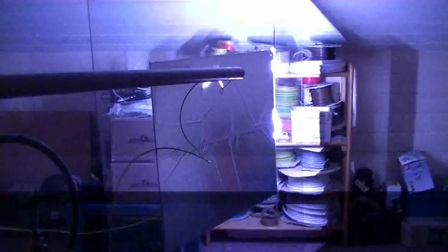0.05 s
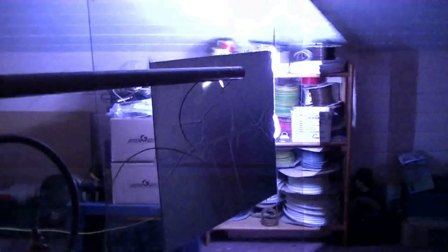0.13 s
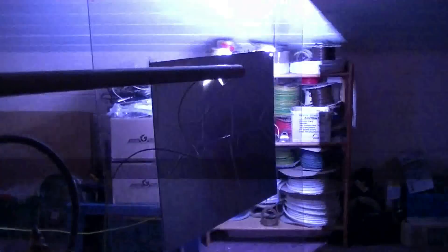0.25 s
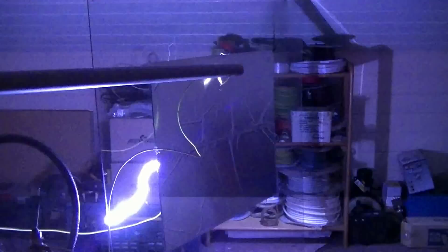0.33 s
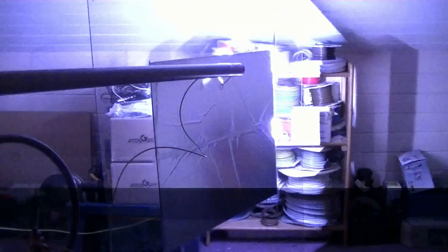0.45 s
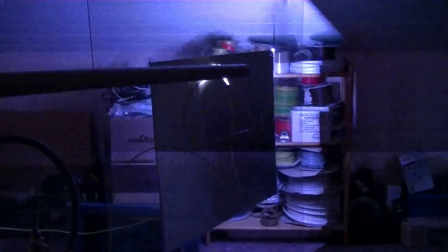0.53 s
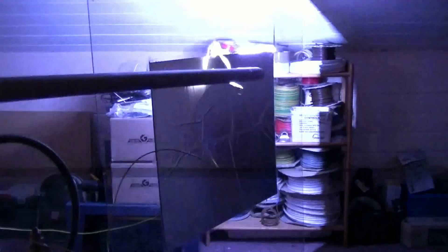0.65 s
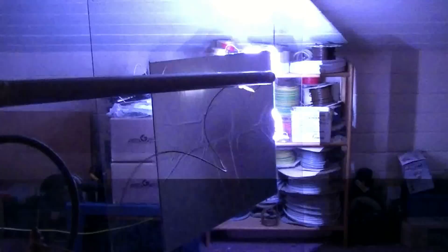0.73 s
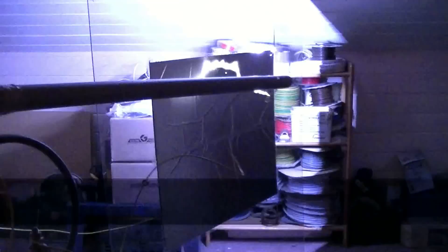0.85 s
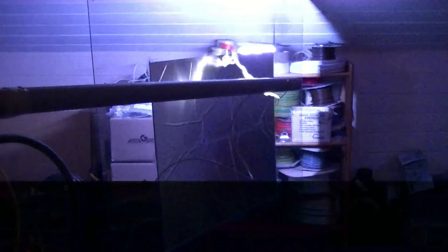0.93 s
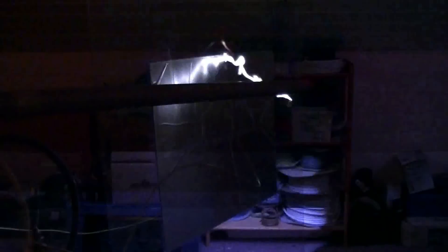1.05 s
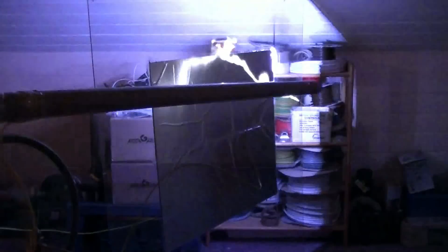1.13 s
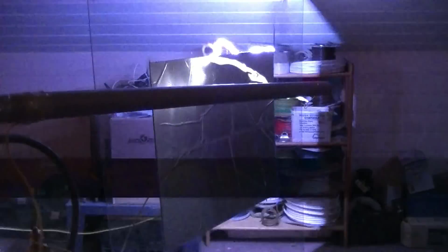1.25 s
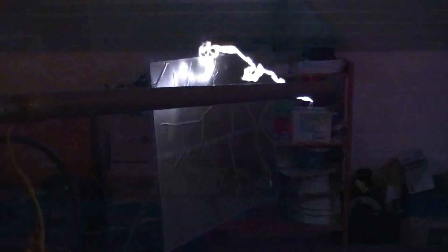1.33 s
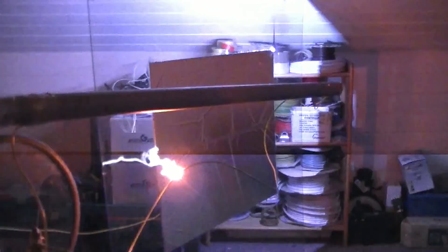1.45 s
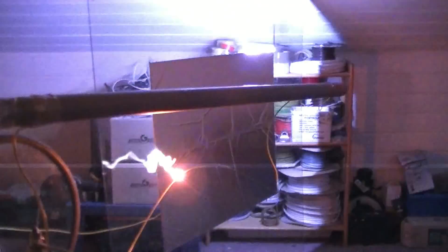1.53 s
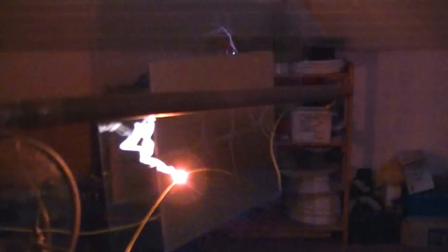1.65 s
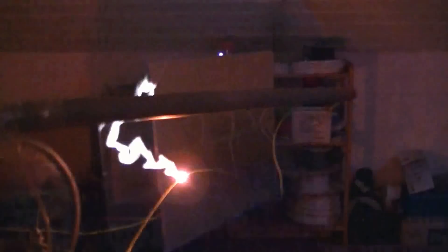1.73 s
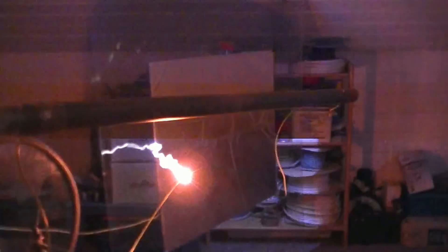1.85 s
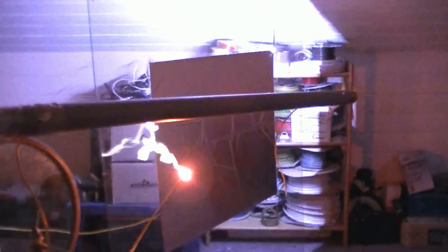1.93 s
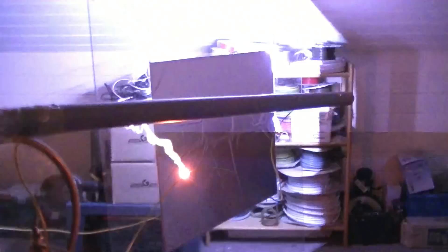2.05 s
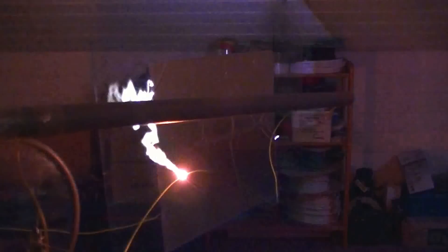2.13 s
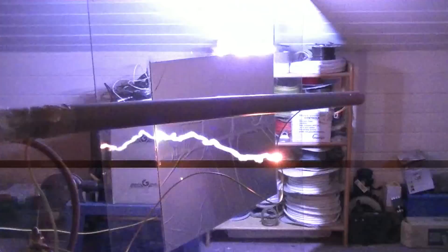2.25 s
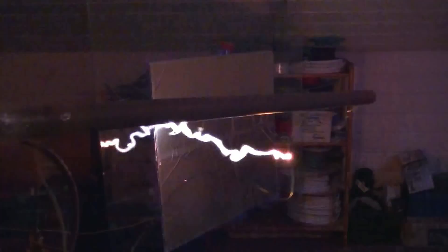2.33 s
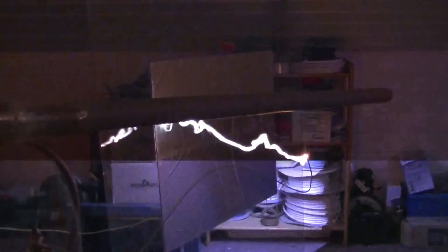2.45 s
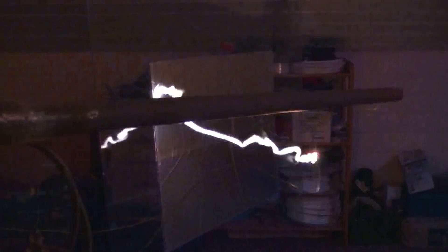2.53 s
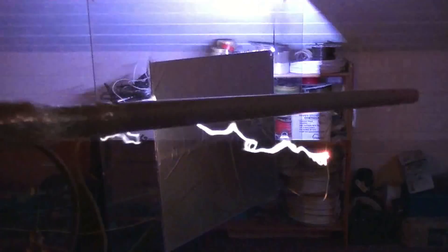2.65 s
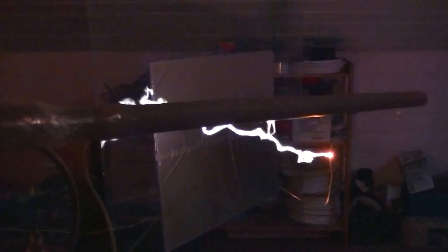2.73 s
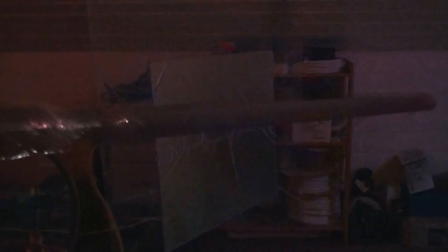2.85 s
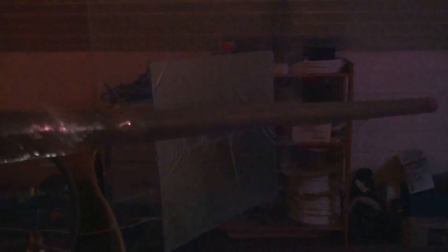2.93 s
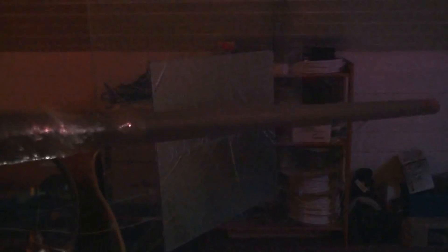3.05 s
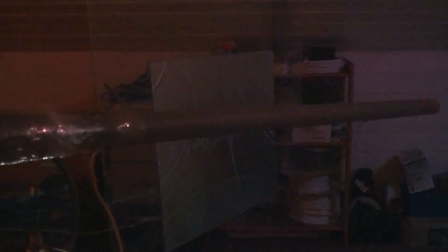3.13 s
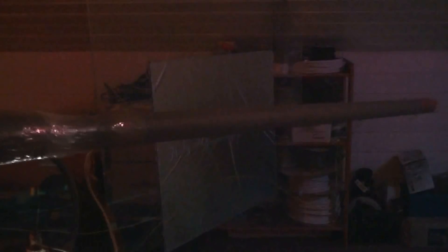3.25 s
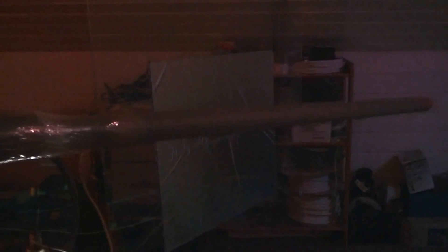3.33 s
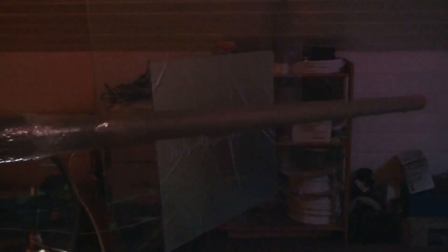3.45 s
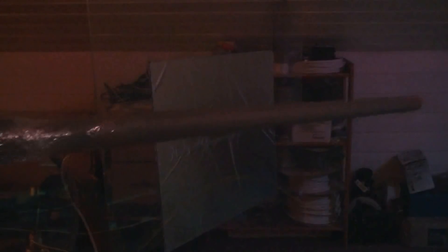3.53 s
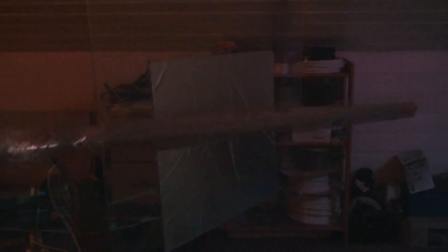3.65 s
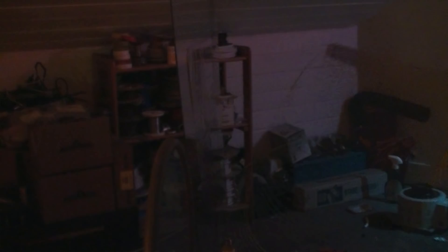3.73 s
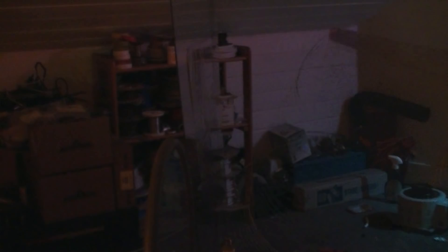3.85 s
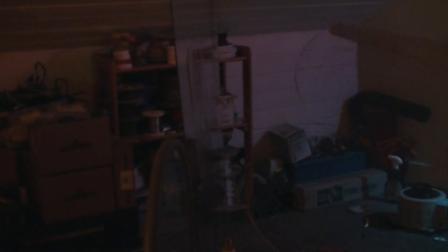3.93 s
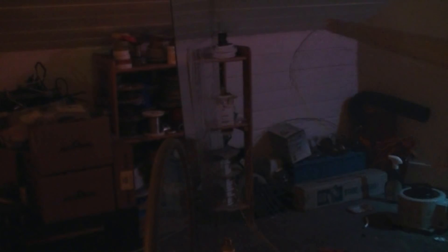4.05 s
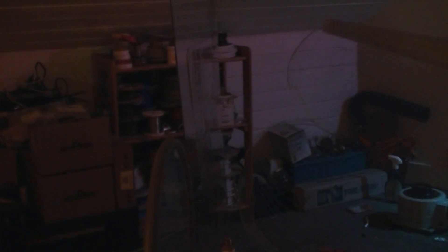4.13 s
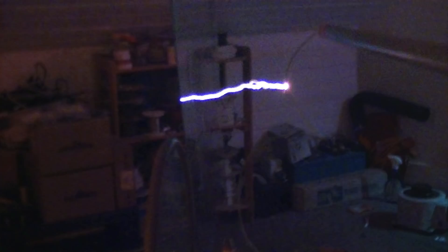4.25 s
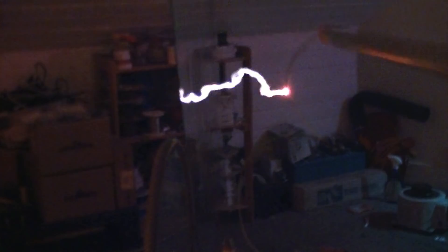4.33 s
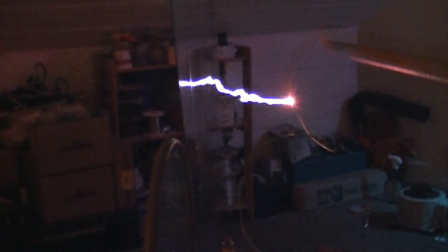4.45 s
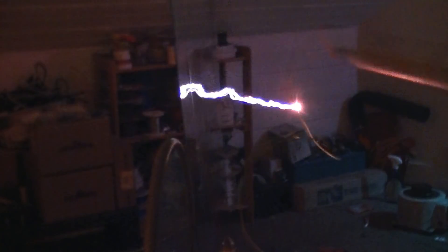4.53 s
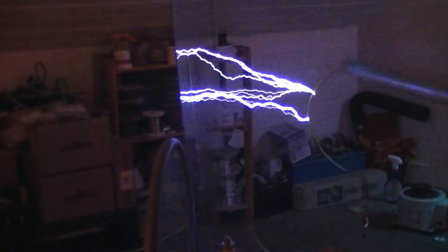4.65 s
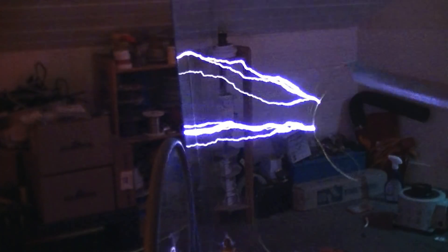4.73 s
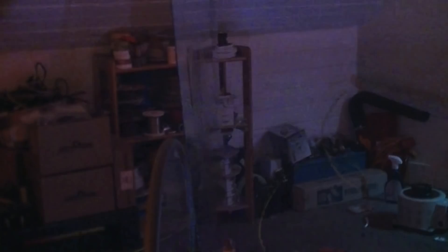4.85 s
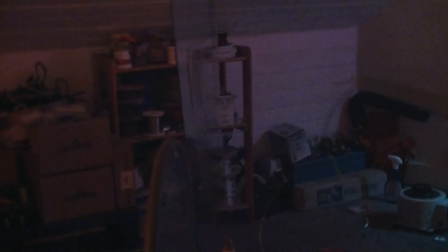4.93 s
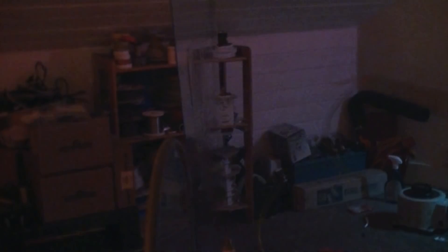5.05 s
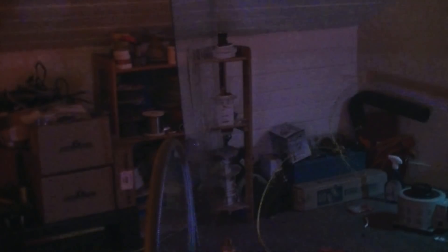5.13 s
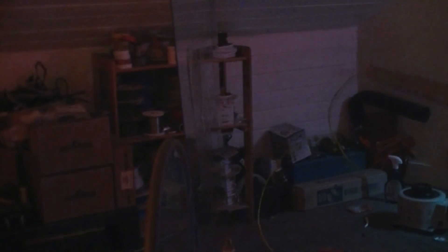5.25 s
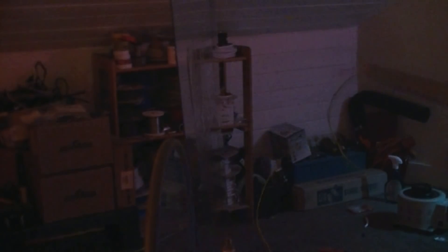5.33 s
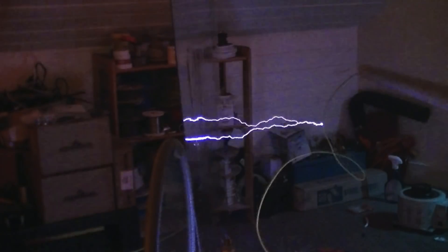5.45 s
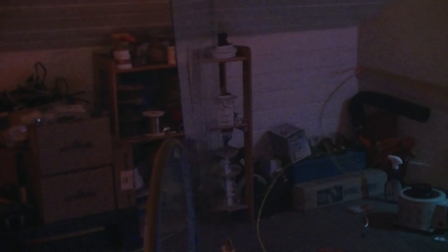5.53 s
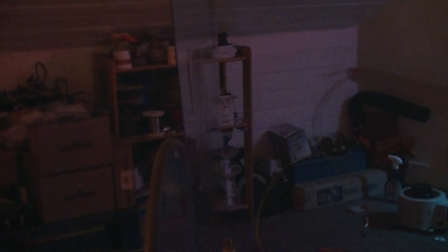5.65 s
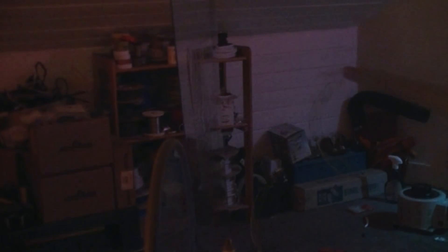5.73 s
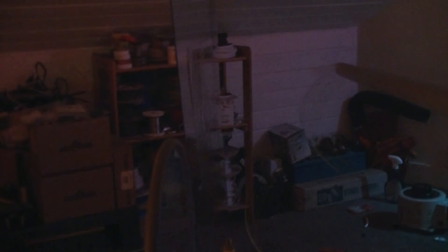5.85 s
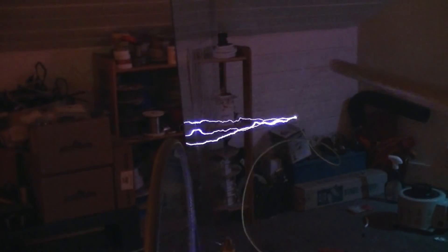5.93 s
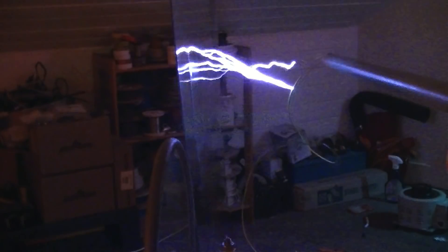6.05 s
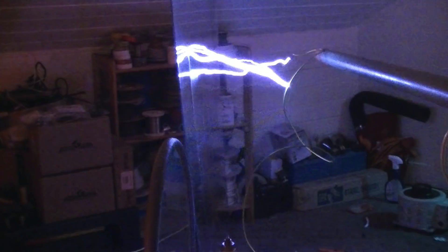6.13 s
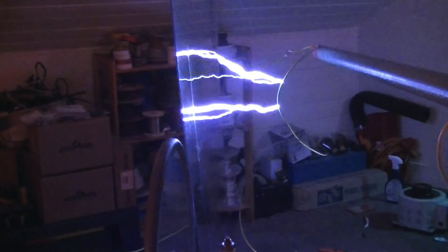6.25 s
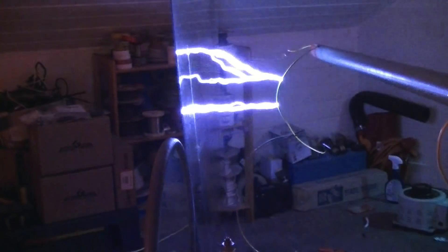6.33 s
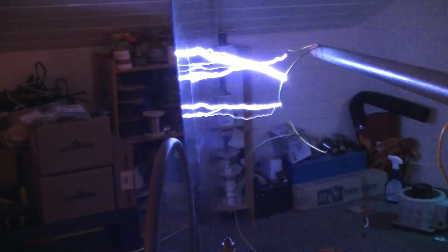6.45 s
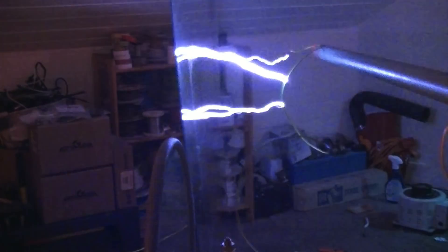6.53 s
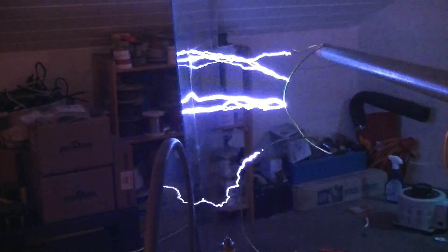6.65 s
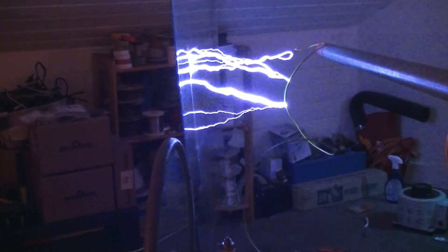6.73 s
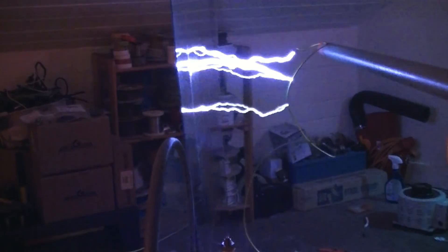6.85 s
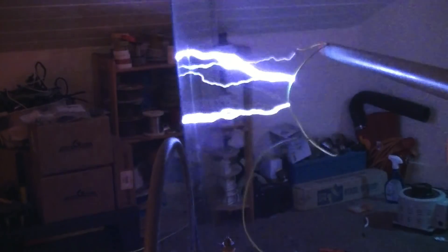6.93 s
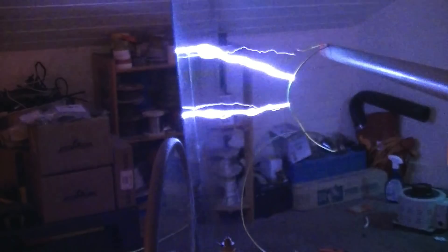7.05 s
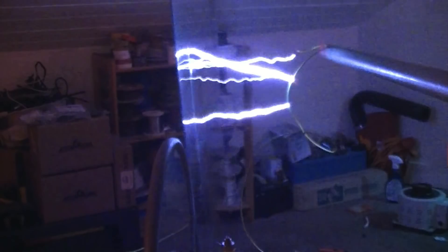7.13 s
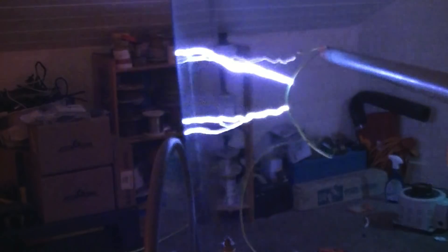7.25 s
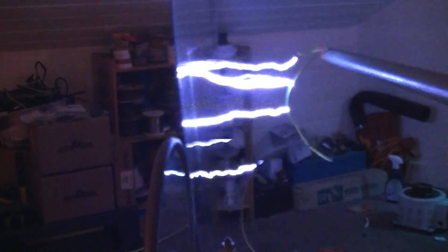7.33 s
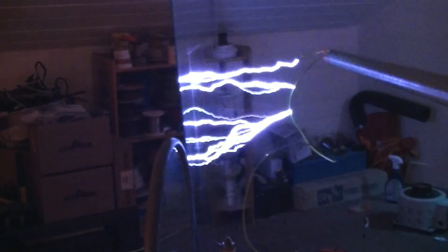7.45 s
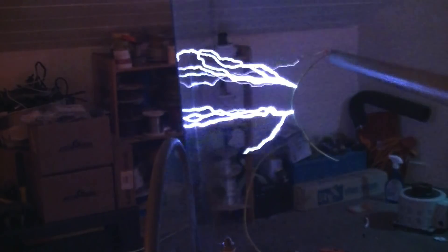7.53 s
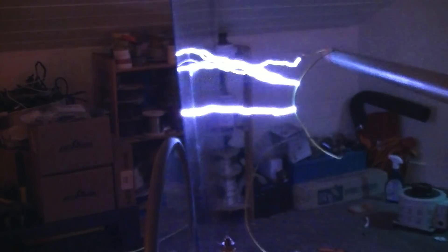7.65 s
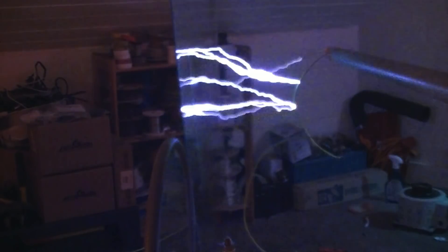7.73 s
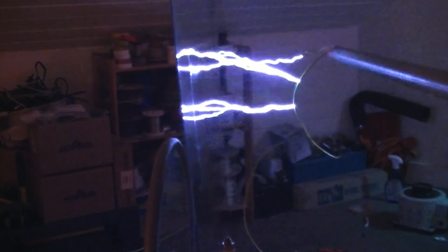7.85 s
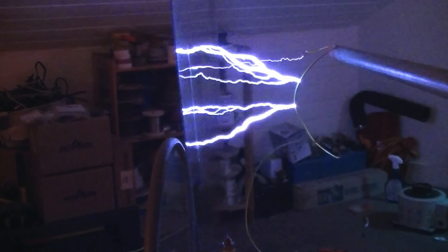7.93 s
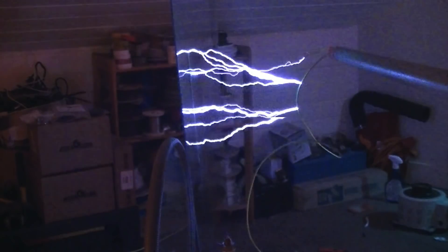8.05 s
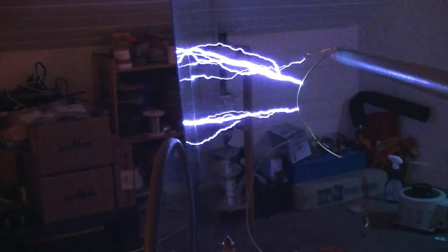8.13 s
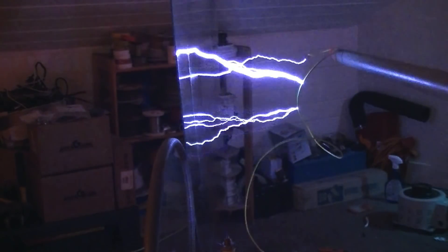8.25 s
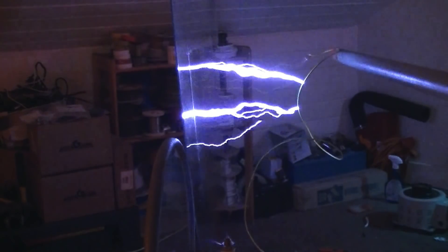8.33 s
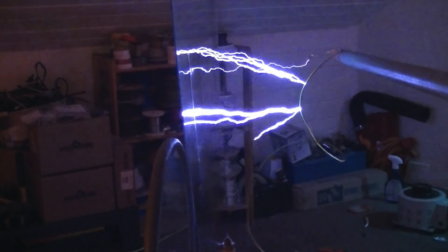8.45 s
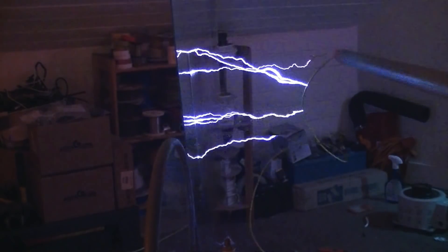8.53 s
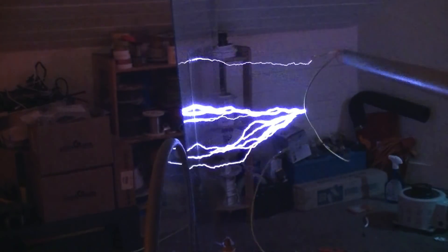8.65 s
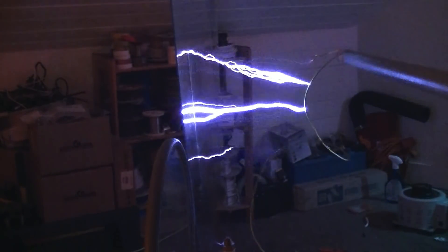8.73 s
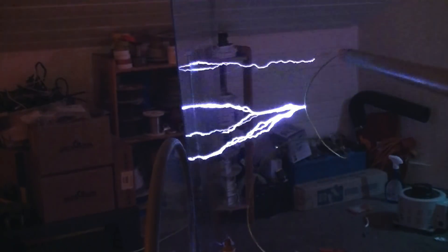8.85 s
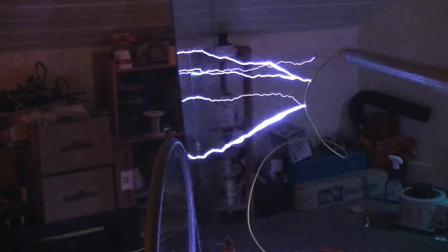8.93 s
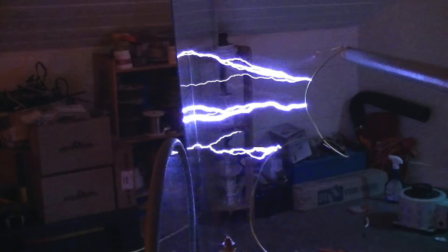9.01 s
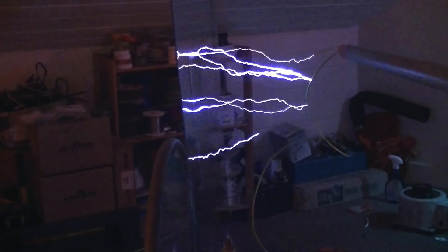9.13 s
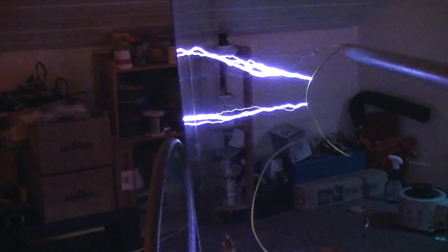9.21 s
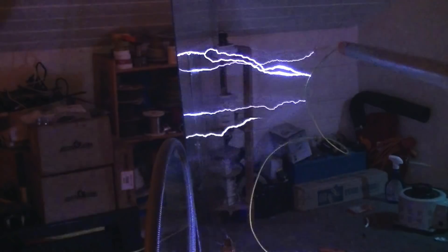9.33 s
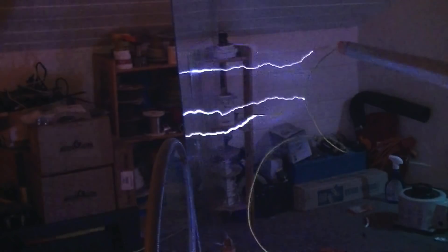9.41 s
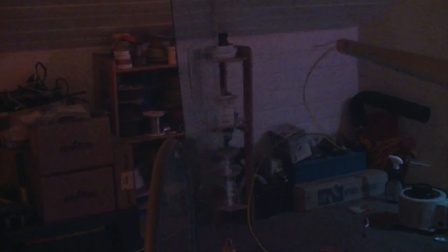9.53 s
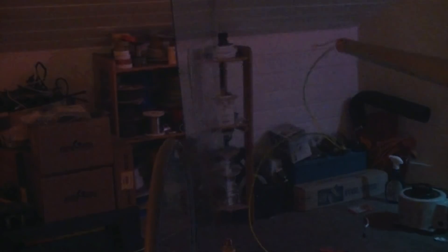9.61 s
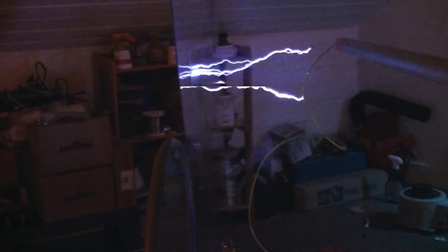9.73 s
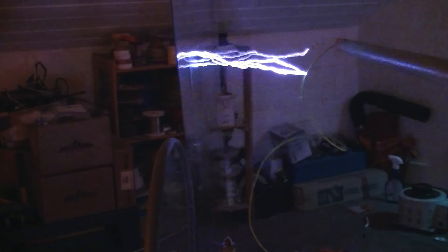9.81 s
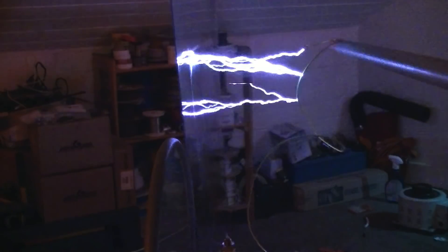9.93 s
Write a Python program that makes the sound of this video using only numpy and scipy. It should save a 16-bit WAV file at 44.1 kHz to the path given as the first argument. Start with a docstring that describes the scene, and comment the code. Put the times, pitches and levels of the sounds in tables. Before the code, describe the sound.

A rough electric buzz of many tiny sparks, duller and roomy, stutters for nearly three seconds and stops. A short regular buzz swells and dies; hushed room tone and light hollow knocks follow. Then close, brighter arcing snaps on, alternating hissing, humming fry with dense crackle, and settles into a continuous hard buzzing volley with blunt irregular thumps overloading the microphone. Short indoor echoes.

```python
"""High-voltage arcs in a workshop

A high-voltage supply on 50 Hz mains arcs in a small workshop. Sparks, built from spikes timed to the half cycle,
creep over an insulating plate in stuttering bursts; then a corona of regular puffs and ticks buzzes on the rod.
The rod knocks and scrapes as it is moved, and a hot arc fries across an air gap with sharp restrikes.
It breaks up into volleys of sparks on every half cycle. The hardest discharges thump the microphone
with blunt pulses. Tones locked to the mains make the hum, and coloured noise the room tone."""
import sys
import numpy as np
from scipy import signal
from scipy.fft import rfft, irfft, next_fast_len
from scipy.io import wavfile
from scipy.ndimage import uniform_filter1d

SR = 44100
rng = np.random.default_rng(int(sys.argv[2]) if len(sys.argv) > 2 else 0)


def digitize_waveform(pressure):
    """Quantize a signal to 16-bit integers and store it at the path in sys.argv[1].

    Rows of a 2-D input are taken as channels; values are limited to [-1, 1].
    """
    field = np.atleast_2d(pressure).T
    bounded = np.clip(field, -1, 1)
    quanta = np.round(bounded * 32767).astype(np.int16)
    wavfile.write(sys.argv[1], SR, quanta)


N = 440118
TIME = np.arange(N) / SR  # s
HALF_CYCLE_HZ = 100.1
TOP_HZ = 15700  # nothing is kept above this

# All levels are relative: mix gains come on top of them.
# bursts of sparks creeping over the plate: start t/s, end t/s, level/dB, ignition/dB (above 0 hard, below soft)
BURSTS = [(0, .345, -21.5, 6), (.36, .87, -22.5, 1), (.897, 1.01, -21, 4), (1.037, 1.059, -23, 1),
          (1.097, 1.363, -24, 0), (1.435, 1.458, -24.5, 4), (1.481, 1.497, -23, 1.5),
          (1.513, 1.655, -23, 0), (1.696, 1.716, -21.5, 1), (1.73, 1.795, -24.5, -2),
          (1.834, 1.855, -22, 1), (1.876, 1.906, -25, 4), (1.937, 2.066, -24, 1), (2.094, 2.19, -24, 4.5),
          (2.236, 2.292, -24.5, 0), (2.313, 2.385, -23, 3), (2.434, 2.46, -26, 7), (2.495, 2.565, -23, 6),
          (2.677, 2.74, -24.5, 3), (2.824, 2.835, -24, -2), (2.848, 2.868, -24.5, -7)]
# the thin arc that keeps burning between the bursts: t/s, level/dB
SIZZLE = [(0, -30.5), (1.35, -36), (2.6, -36.5), (2.89, -42.5)]
# the hot arc frying, one list for each burn: t/s, body level/dB, fizz level/dB
ARC = [
    [(4.3, -29.5, -31), (4.41, -26, -33), (4.458, -35, -28), (4.506, -27.5, -32), (4.65, -28.5, -29)],
    [(4.91, -26.5, -28.5), (5.1, -26.5, -33), (5.13, -26.5, -28), (5.36, -27, -30.5), (5.406, -27, -30.5),
     (5.678, -27.5, -29), (5.726, -26.5, -33.5), (5.95, -26.5, -30), (5.98, -27, -33)],
    [(9.57, -39, -41), (9.71, -32, -38), (9.72, -38, -32)],
]
# runs of sharp restrikes in the hot arc: start t/s, end t/s, body level/dB, fizz level/dB
STRIKES = [(4.37, 4.7, -34, -38), (5, 5.058, -30, -39), (5.057, 5.117, -25.5, -43),
           (5.117, 5.169, -36, -36), (5.28, 5.295, -25, -37), (5.367, 5.438, -40, -32),
           (5.71, 5.852, -32.5, -32), (5.919, 5.979, -32, -38), (9.635, 9.722, -37, -38)]
# earliest moment in the half cycle for the hot arc's spikes: t/s, delay/s
RESTRIKE = [(4.3, 0.0081), (4.65, 0.0097), (5, 0.0076), (5.95, 0.0075), (9.57, .0077), (9.72, 0.0081)]
# the low rush under the hot arc's frying: t/s, level/dB
RUSH = [(4.3, -39), (4.45, -39), (4.65, -37.5), (4.92, -40), (5.0, -37.5), (5.06, -41), (5.15, -36.5),
        (5.23, -42), (5.29, -37), (5.32, -51), (5.4, -43), (5.48, -36.5), (5.59, -39.5), (5.66, -36),
        (5.78, -42), (5.87, -42), (5.98, -39)]
# volleys of sparks across the gap: start t/s, end t/s, level/dB, ignition/dB
VOLLEYS = [(4.237, 4.26, -23.5, 4), (4.262, 4.297, -23.5, -2), (4.645, 4.906, -24.5, 2),
           (5.977, 9.508, -24, 0), (9.714, 9.98, -25, -8)]
# the supply's hum: multiple of the half-cycle rate, first burn level/dB, second burn level/dB
HUM = [(1, -56, -62.5), (2, -60, -56), (3, -51.5, -63), (4, -51, -54.5), (5, -57, -69), (6, -56, -63),
       (7, -56, -62), (8, -43.5, -58), (9, -45, -64), (10, -58, -62), (10.5, -50.5, -58), (11.5, -47, -54),
       (14.5, -54, -56)]
# the sharpest cracks: t/s, peak level/dB
CRACKS = [(0.9033, 1), (1.1004, 4), (1.336, -1.5), (2.0044, 1), (2.7137, 2), (3.3441, -7.5), (3.4441, -8),
          (3.4838, -3.5), (4.2378, 12), (4.3551, -7), (4.395, 0.5), (4.415, -2), (4.4346, -5), (4.4548, -5),
          (4.4949, -2), (4.5147, -6), (4.5348, -4), (4.575, -2), (4.5948, -3), (4.615, -3), (4.635, -1),
          (4.6947, -7), (4.7725, -9), (4.9033, -4), (5.0331, -5), (5.0732, -5), (5.093, -2), (5.1029, -6),
          (5.1333, -2), (5.1437, -2), (5.1534, -3), (5.3044, -0.5), (5.3925, -5), (5.413, -2), (5.4235, -1),
          (5.4448, 1), (5.5829, -6), (5.6042, -7), (5.7121, -6), (5.7327, -1.5), (5.7527, -9), (5.7729, -5),
          (5.7829, -5), (5.8431, -2), (5.9225, -4), (5.9315, -8), (5.9846, -1), (5.9937, 2), (9.7292, -6)]
# the heaviest thumps: t/s, peak level/dB
THUMPS = [(.026, -20), (0.046, -22), (.11, -21), (.125, -17), (.187, -20), (.207, -22), (0.2844, -17),
          (0.3641, -12.5), (0.376, -18.5), (0.404, -13.5), (.495, -17), (0.525, -13), (0.618, -15),
          (0.639, -14), (.659, -18), (.7664, -17), (.836, -23), (0.9033, -12.5), (0.9463, -18), (.979, -17),
          (1.0447, -21), (1.1008, -14), (1.135, -17), (1.3365, -16.5), (1.439, -20), (1.4898, -18),
          (1.5149, -11.5), (1.5395, -20), (1.5835, -12.5), (1.7002, -18.5), (1.7455, -15.5), (1.835, -24),
          (1.9117, -11), (1.946, -18), (2.0054, -17.5), (2.058, -21), (2.1256, -18), (2.178, -17),
          (2.275, -20), (2.315, -23), (2.336, -18), (2.3746, -24), (4.239, -13), (4.259, -12),
          (4.2768, -10.5), (4.4557, -20.5), (4.655, -16), (4.676, -16.5), (4.6967, -14), (4.736, -17),
          (4.7555, -9.5), (4.7738, -22), (4.793, -14), (4.8567, -18), (4.9032, -16), (5.1531, -19.5),
          (5.304, -15), (5.4457, -6.5), (5.604, -10.5), (6.076, -10.5), (6.215, -14.5), (6.237, -13),
          (6.2874, -11), (6.3336, -9.5), (6.414, -13.5), (6.455, -14), (6.475, -12), (6.536, -13.5),
          (6.576, -14), (6.653, -14.5), (6.767, -15), (6.8334, -11.5), (6.874, -11), (6.9838, -13.5),
          (7.0547, -9), (7.0965, -12), (7.165, -12), (7.215, -16), (7.236, -11.5), (7.253, -13),
          (7.4308, -10), (7.473, -16), (7.512, -11), (7.5553, -11), (7.591, -14), (7.612, -12),
          (7.673, -10), (7.7143, -14), (7.734, -14), (7.853, -12), (7.874, -16), (8.0424, -10.5),
          (8.113, -12), (8.1725, -12), (8.192, -13), (8.222, -14), (8.29, -11), (8.314, -17), (8.372, -14),
          (8.3923, -10), (8.551, -10), (8.5613, -10.5), (8.583, -15.5), (8.71, -15), (8.772, -15.5),
          (8.834, -14), (8.851, -14.5), (8.952, -15), (8.971, -15), (9.0, -15), (9.132, -18),
          (9.169, -16.5), (9.194, -16), (9.31, -16), (9.39, -15), (9.432, -16), (9.45, -19), (9.731, -7),
          (9.75, -14), (9.8543, -12.5), (9.912, -11), (9.9697, -11)]
# the rod's knocks as it is moved: t/s, peak level/dB
KNOCKS = [(3.966, -27), (3.986, -36), (3.998, -32), (4.026, -39), (4.143, -46)]
# ringing modes of a knock: f/Hz, level/dB, t60/s
KNOCK_MODES = [(267, -20, 0.08), (343, 4, 0.062), (447, 7, 0.043), (643, -4, .04), (1000, -6, 0.034)]
# the rod's scrapes: start t/s, end t/s, level/dB
SCRAPES = [(4.116, 4.16, -43), (4.205, 4.236, -40.5)]
# level of the background rush, which rises through the pause and drops again at 4.3 s: t/s, level/dB
FLOOR_DB = [(2.9, -76), (3.3, -60), (3.77, -60), (3.83, -50.5), (4.23, -50.5), (4.3, -61)]
# decay of the workshop's echoes: f/Hz, t60/s
WORKSHOP = [(150, 0.45), (1000, 0.3), (4000, 0.31), (9000, 0.26), (15000, 0.26)]
# stereo width of the echoes: f/Hz, side against mid level/dB
WIDTH = [(100, -15), (400, -17), (1300, -19), (3000, -15.5), (7000, -16.5), (10000, -55)]

# spectrum of sparks on the plate: f/Hz, level/dB
CREEP_COLOUR = [(40, -30), (150, -24), (330, -9), (550, -2.5), (800, -3.5), (1300, -0.5), (1870, 1),
                (2650, -1), (3300, 0.5), (4900, 1), (7000, -4.5), (10400, -7.5), (13800, -18.5),
                (15500, -33)]
# spectrum of the corona's ticks: f/Hz, level/dB
CORONA_COLOUR = [(150, -35), (400, -10), (900, -10.5), (1400, -7.5), (2100, -5), (2500, -7), (3100, -3.5),
                 (4200, -3.5), (8000, -11), (15000, -25.5)]
# spectrum of the corona's puffs: f/Hz, level/dB
PUFF_COLOUR = [(30, -45), (100, -14), (200, -22), (300, 0.5), (500, 0.5), (600, -2), (700, -4.5), (900, -7),
               (1100, 0), (1400, -8), (2100, -4), (3200, -1.5), (4500, -12), (8000, -20), (15000, -34)]
# spectrum of bright cracks in the open gap: f/Hz, level/dB
ARC_COLOUR = [(80, -37), (250, -10.5), (550, -7.5), (850, -2), (1300, 2), (2100, 3.5), (2700, 0.5),
              (4700, -2), (7200, -8.5), (9500, -1), (12500, -6), (15500, -10.5)]
# spectrum of the hot arc's body: f/Hz, level/dB
FRY_COLOUR = [(60, -45), (250, -33), (850, -12), (1300, -10.5), (1500, -3.5), (2150, 1), (2700, -1),
              (3400, 1.5), (4800, -1), (6000, -4.5), (9000, -32.5)]
# spectrum of the hot arc's fizz: f/Hz, level/dB
FIZZ_COLOUR = [(1500, -37), (4500, -26), (5800, -3), (7200, -0.5), (9500, -0.5), (12500, -6),
               (15500, -18.5)]
# spectrum of the hot arc's low rush: f/Hz, level/dB
RUSH_COLOUR = [(50, -29), (110, -14), (250, -8), (550, -4.5), (850, 0.5), (1050, 2.5), (1300, -3),
               (1700, -15.5), (4000, -45)]
# spectrum of the volleys: f/Hz, level/dB
VOLLEY_COLOUR = [(40, -18.5), (200, -14), (480, -10), (760, 0.5), (905, 1.5), (1080, -2), (1350, -2),
                 (1850, 2.5), (2900, -0.5), (4800, -1.5), (6000, -3), (7200, -8), (9500, -2), (12500, -8.5),
                 (15500, -21.5)]
# spectrum of the scrapes: f/Hz, level/dB
SCRAPE_COLOUR = [(120, -41), (200, -16), (360, -6), (532, -15), (815, -4), (1060, -17), (1200, -18),
                 (1660, -26), (1950, -16), (2370, -27), (4030, -25), (4490, -20), (14000, -41)]
# spectrum of the room tone: f/Hz, level/dB
FLOOR_COLOUR = [(18, -50), (30, -27), (56, -7), (140, -6.5), (206, -5.5), (296, -7), (577, -14),
                (1000, -17), (3070, -23.5), (14000, -42.5)]

# resonances of the volleys: f/Hz, width f/Hz, level/dB
VOLLEY_RING = [(920, 39, -2.5), (1823, 47, -15), (1946, 50, -11), (4780, 100, -11)]
# resonances of the hot arc's body: f/Hz, width f/Hz, level/dB
FRY_RING = [(1504, 30, -1.5), (1684, 24, -3), (2230, 98, -9.5)]
# resonances of the scrapes: f/Hz, width f/Hz, level/dB
SCRAPE_RING = [(1000, 60, -2), (1910, 60, 0), (4490, 120, -2)]
# resonances of the corona's ticks: f/Hz, width f/Hz, level/dB
CORONA_RING = [(2150, 200, -8), (3050, 610, 0)]
# resonances of the corona's puffs: f/Hz, width f/Hz, level/dB
PUFF_RING = [(306, 14, 0), (403, 9.6, -3), (1101, 30, -10)]

# the corona's stages: t/s at which it lights, starts to swell, is full, weakens, goes out
CORONA_S = (3.041, 3.16, 3.35, 3.49, 3.55)
# pulse widths of the light thumps, blunt, middling and tight: width/s
PATTER_WIDTHS_S = (.00038, .00022, .00013)

CORONA_FAINT_DB, CORONA_FULL_DB = -41.5, -29
CORONA_RISE_DB_PER_S, CORONA_FALL_DB_PER_S = 239, 117
PUFFS_GROW, TICKS_GROW = 0.85, 1.22  # exponents: the puffs swell less than the streamers' ticks
SETTLE_S = 0.0035  # time constant from a run's ignition to its level
TIRE_AFTER_S, TIRE_DB_PER_S = 2.43, 2  # a long run holds its strength, then slowly weakens
PATTER_PLATE_DB, PATTER_GAP_DB = -24.5, -17  # light thumps: plate at the start, and gap
PATTER_FADE_DB_PER_S = 2.5  # thumps from the plate grow lighter with time
PATTER_FROM_S = 5.9  # in the gap, only volleys after this patter
PATTER_GROWS, FULL_RUN_DB = 2.4, -23.5  # thumps swing wider than the run does about its full strength
PATTER_RANGE_DB, PATTER_WEAK_DB = 12, 6.5  # drop per unit of the size draw; drop on the weak polarity
SQUEAK = (2.82, 2.865, -36)  # start t/s, end t/s, level/dB
SQUEAK_HZ, SQUEAK_WIDTH_HZ = 950, 99
HUM_IDLE_DB = -7.5  # under sparks alone and the last faint burn, against the second burn
HUM_FADE_S, HUM_WAVER_DB = .2, 3  # fade time constant after the first burn; rms waver set at its knots


def amp(db):
    """Decibels to gain."""
    return 10 ** (np.asarray(db) / 20)


def unit(x):
    """Scale to rms 1."""
    return x / np.sqrt(np.mean(x ** 2) + 1e-20)


def pick(rows, *columns):
    """Keep only these columns of a table."""
    return np.array(rows)[:, list(columns)]


def along(points, hz):
    """(f/Hz, value) points read on a log axis."""
    f, value = np.transpose(points)
    return np.interp(np.log(hz + 1), np.log(f + 1), value)


def level(rows):
    """Gain per sample from (t/s, level/dB) rows, practically silent outside them."""
    s, db = np.transpose(rows)
    return amp(np.interp(TIME, s, db, left=-150, right=-150))


def gates(rows):
    """Gain per sample from (start t/s, end t/s, level/dB) rows."""
    return sum(amp(db) * ((TIME >= start) & (TIME < end)) for start, end, db in rows)


def runs(rows):
    """Gain per sample of runs of sparks: ignition, hold, slow weakening."""
    gain = np.zeros(N)
    for start, end, db, ignition_db in rows:
        on = (TIME >= start) & (TIME < end)
        age = TIME[on] - start
        ignition = ignition_db * np.exp(-age / SETTLE_S)
        weakening = TIRE_DB_PER_S * np.maximum(age - TIRE_AFTER_S, 0)
        gain[on] += amp(db + ignition - weakening)
    return gain


def clicks(times, sizes):
    """One impulse at each time."""
    index = np.round(np.ravel(times) * SR).astype(int)
    inside = (index >= 0) & (index < N)
    return np.bincount(index[inside], np.ravel(sizes)[inside], N)


def convolve(x, response):
    """Pass x through one response, or one for each channel."""
    return signal.oaconvolve(np.atleast_2d(x), np.atleast_2d(response), axes=1)[:, :N]


def snap(colour, size=4096):
    """The causal pulse of energy 1 that has this spectrum, by folding its cepstrum to minimum phase."""
    cepstrum = irfft(np.log(amp(along(colour, np.fft.rfftfreq(size, 1 / SR)))))
    cepstrum[1:size // 2] *= 2
    cepstrum[size // 2 + 1:] = 0
    pulse = irfft(np.exp(rfft(cepstrum)))
    return pulse / np.linalg.norm(pulse)


def resonance(x, hz, width_hz):
    """x through one narrow resonant peak."""
    return signal.lfilter(*signal.iirpeak(hz, hz / width_hz, fs=SR), x)


def ringing(x, resonances):
    """x with narrow resonances added."""
    return x + sum(amp(db) * resonance(x, hz, width) for hz, width, db in resonances)


def sparks_at(times, sizes, crooked, count=8):
    """Each spark is one steep spike; the kinks of its crooked channel arrive just after it."""
    lag = .0005 * rng.exponential(size=(len(times), count))
    kinks = crooked * sizes[:, None] * np.clip(rng.standard_normal(lag.shape), -2, 2)
    return clicks(times, -sizes) + clicks(times[:, None] + lag, kinks)


def discharges(delay, window, scatter_db, cycle_db, polarity_db, crooked, count, early=0):
    """Spikes of rms 1: count sparks in each half cycle, while the voltage is high enough to break the air."""
    cycle = np.arange(-1, int(N / SR * HALF_CYCLE_HZ))[:, None]
    odd = cycle % 2  # the two polarities alternate
    start = cycle / HALF_CYCLE_HZ
    times = start + np.interp(start, *np.transpose(delay)) + window * rng.random((len(cycle), count))
    db = scatter_db * np.clip(rng.standard_normal(times.shape), -2, 2)
    db = db + cycle_db * rng.standard_normal(start.shape)
    # odd half cycles differ in strength and may fire sooner
    db = db + polarity_db * odd
    times = times - early * odd
    return unit(sparks_at(times.ravel(), amp(db).ravel(), crooked))


def placed(x, wet_db):
    """Share a sound's energy between two rows: straight to the microphone, and into the room."""
    return x * np.array([[1], [amp(wet_db)]]) / np.hypot(1, amp(wet_db))


def diffuse(size, wide_db):
    """Diffuse noise as two close microphone ports get it: f/Hz, t/s, short-time spectra of left and right."""
    hz, t, (mid, side) = signal.stft(rng.standard_normal((2, size)), SR, nperseg=256)
    side = side * amp(along(WIDTH, hz) + wide_db)[:, None]
    return hz, t, np.array([mid + side, mid - side])


def workshop(paths, wide_db, count):
    """Direct sound plus the walls' answer; a source drifts among count places, each with its own echoes."""
    out, send = paths
    knots = np.linspace(0, N / SR, 400)
    presence = np.array([np.interp(TIME, knots, rng.standard_normal(len(knots))) for _ in range(count)])
    for share in presence / np.linalg.norm(presence, axis=0):
        hz, t, noise = diffuse(SR // 3, wide_db)
        decay = amp(-60 * t / along(WORKSHOP, hz)[:, None])
        tail = signal.istft(noise * decay, SR, nperseg=256)[1]
        tail *= np.clip(np.arange(tail.shape[1]) / SR / 0.0016, 0, 1)  # echoes fade in over 1.6 ms
        out = out + convolve(send * share, tail / np.linalg.norm(tail[0]))
    return out


def room_tone():
    """The soft rush of the workshop: coloured noise, partly unrelated in the two channels."""
    air = rng.standard_normal(N) + 0.5 * rng.standard_normal((2, N))
    return unit(convolve(air, snap(FLOOR_COLOUR))) * amp(np.interp(TIME, *np.transpose(FLOOR_DB)))


def harmonics(rows):
    """Tones locked to the mains, each wavering in strength, from (multiple, level/dB) rows."""
    knots = np.linspace(0, N / SR, 300)
    tones = 0
    for multiple, db in rows:
        waver_db = HUM_WAVER_DB * np.interp(TIME, knots, rng.standard_normal(len(knots)))
        turns = multiple * HALF_CYCLE_HZ * TIME + rng.random()
        tones = tones + amp(db + waver_db) * np.sqrt(2) * np.sin(2 * np.pi * turns)
    return tones


def hum():
    """The supply hums as the arc draws current, in one colour for the first burn and another elsewhere."""
    first, second, last = ((rows[0][0], rows[-1][0]) for rows in ARC)
    # the first colour fades into the volley after its burn
    fading = np.exp(-np.maximum(TIME - first[1], 0) / HUM_FADE_S)
    fading = fading * (TIME > first[0]) * (TIME < second[0])
    idle = [(0, SIZZLE[-1][0]), last] + [(start, end) for start, end, *_ in VOLLEYS]
    steady = gates([(*second, 0)] + [(*span, HUM_IDLE_DB) for span in idle])
    first_hum = harmonics(pick(HUM, 0, 1)) * uniform_filter1d(fading, size=2048)
    return first_hum + harmonics(pick(HUM, 0, 2)) * uniform_filter1d(steady, size=2048)


def rod():
    """The rod is moved to the gap: knocks as decaying modes, scrapes as coloured, resonant noise."""
    t = np.arange(SR // 4) / SR
    ring = sum(amp(db - 60 * t / t60) * np.sin(2 * np.pi * hz * t) for hz, db, t60 in KNOCK_MODES)
    s, db = np.transpose(KNOCKS)
    knocks = convolve(clicks(s, amp(db)), ring / np.abs(ring).max())
    scrapes = convolve(rng.standard_normal(N) * gates(SCRAPES), snap(SCRAPE_COLOUR))
    return placed(knocks + ringing(scrapes, SCRAPE_RING), wet_db=-13)


def squeak():
    """A narrow band of noise that squeaks briefly around the last burst."""
    band = resonance(rng.standard_normal(N), SQUEAK_HZ, SQUEAK_WIDTH_HZ)
    return placed(unit(band) * gates([SQUEAK]), wet_db=-14)


def corona_strength():
    """Gain per sample: the corona lights faintly, swells, holds, weakens and goes out."""
    lit, swelling, full, weakening, out = CORONA_S
    db = np.interp(TIME, [swelling, full], [CORONA_FAINT_DB, CORONA_FULL_DB])
    db = db - CORONA_RISE_DB_PER_S * np.maximum(lit - TIME, 0)
    db = db - CORONA_FALL_DB_PER_S * np.maximum(TIME - weakening, 0)
    return amp(db) * (TIME < out)


def corona():
    """A regular puff at every voltage crest makes a ringing buzz; streamers add sharp ticks as it swells."""
    puffs = discharges([(0, .0074)], window=.00002, scatter_db=.7, cycle_db=.5, polarity_db=.5,
                       crooked=0, count=1)
    ticks = discharges([(0, .0073)], window=.0008, scatter_db=1.2, cycle_db=.8, polarity_db=1,
                       crooked=.35, count=3)
    full = amp(CORONA_FULL_DB)
    swell = corona_strength() / full
    buzz = convolve(amp(-7.5) * puffs * swell ** PUFFS_GROW, snap(PUFF_COLOUR))
    rasp = convolve(amp(-0.5) * ticks * swell ** TICKS_GROW, snap(CORONA_COLOUR))
    buzz, rasp = ringing(buzz, PUFF_RING), ringing(rasp, CORONA_RING)
    return full * (placed(buzz, wet_db=-9) + placed(rasp, wet_db=-1))


def thump(width, rebound, low_hz):
    """A blunt pressure pulse of peak 1 and its slower rebound, through the microphone's bass cut."""
    t = np.arange(SR // 20) / SR - .001  # the pulse peaks 1 ms in
    pulse = np.exp(-.5 * (t / width) ** 2) - rebound * np.exp(-.5 * (t / width / 2 - 2) ** 2)
    pulse = signal.lfilter(*signal.butter(2, low_hz, "high", fs=SR), pulse)
    return -pulse / pulse.max()


def leaning_clicks(times, sizes, lean):
    """Impulses in left and right, each leaning to one channel."""
    return np.array([clicks(times, sizes * (1 + side * lean)) for side in (1, -1)])


def patter(rows, count=2):
    """Light thumps between the heavy ones, each with its own width and lean; stronger runs hit harder."""
    cycle = np.repeat(np.arange(int(N / SR * HALF_CYCLE_HZ)), count)
    when, size, lean, kind = rng.random((len(cycle), 4)).T
    odd = cycle % 2  # the strong polarity, which also fires sooner
    s = cycle / HALF_CYCLE_HZ + .0075 + .0065 * when - .001 * odd
    free = np.abs(s[:, None] + .001 - pick(THUMPS, 0)[:, 0]).min(axis=1) > .004  # clear of heavy thumps
    peak = amp(-PATTER_RANGE_DB * size - PATTER_WEAK_DB * (1 - odd))
    peak = peak * free * (size < .75)  # the smallest quarter is left out
    lean = np.clip(1.96 * (lean - .5) + .12, -1, 1)
    strength = (runs(rows) / amp(FULL_RUN_DB)) ** PATTER_GROWS
    out = 0
    for k, width in enumerate(PATTER_WIDTHS_S):
        chosen = peak * (np.floor(kind * len(PATTER_WIDTHS_S)) == k)
        hits = leaning_clicks(s, chosen, lean)
        out = out + convolve(hits * strength, thump(width, rebound=0.29, low_hz=70))
    return out


def thumps():
    """Heavy discharges overload the two microphone channels unequally; lighter ones patter in between."""
    s, db = np.transpose(THUMPS)
    chance = rng.random((len(s), 2))
    lean = np.clip(1.02 * (chance[:, 0] - .5) + 0.12, -1, 1)
    blunt = chance[:, 1]
    heavy = 0
    for share, width in ((blunt, 0.00032), (1 - blunt, 0.00019)):  # each mixes a blunt and a tight pulse
        hits = leaning_clicks(s - .001, amp(db - 2.5) * share, lean)
        heavy = heavy + convolve(hits, thump(width, rebound=0.18, low_hz=75))
    plate = amp(PATTER_PLATE_DB - PATTER_FADE_DB_PER_S * TIME) * patter(BURSTS)
    gap = amp(PATTER_GAP_DB) * patter(VOLLEYS) * (TIME > PATTER_FROM_S)
    return heavy + plate + gap


def cracks():
    """Single long sparks stand out of the buzz: duller along the plate, bright in the open gap."""
    s, db = np.transpose(CRACKS)
    spikes = sparks_at(s, amp(db), crooked=.18)
    on_plate = TIME < SIZZLE[-1][0]
    dull, bright = snap(CREEP_COLOUR), snap(ARC_COLOUR)
    plate = convolve(spikes * on_plate, dull / dull.max())
    gap = convolve(spikes * ~on_plate, bright / bright.max())
    return placed(amp(-7.5) * plate + gap, wet_db=-6.5)


def creeping_sparks():
    """Many fine branches run over the far side of the plate, so they are heard mostly by way of the room."""
    branches = discharges([(0, .0045)], window=.008, scatter_db=3.0, cycle_db=0.97, polarity_db=2.5,
                          crooked=0.44, count=16)
    sizzle = discharges([(0, .007)], window=.004, scatter_db=4, cycle_db=2, polarity_db=12,
                        crooked=0.47, count=6)
    sparks = branches * runs(BURSTS) + sizzle * level(SIZZLE)
    return placed(convolve(sparks, snap(CREEP_COLOUR)), wet_db=1.0)


def volleys():
    """The gap recharges and breaks down several times in every half cycle, in spikes of similar size."""
    sparks = discharges([(0, .0086)], window=.0052, scatter_db=2.4, cycle_db=1, polarity_db=3,
                        crooked=.3, count=9, early=.001)
    sound = convolve(amp(-0.31) * sparks * runs(VOLLEYS), snap(VOLLEY_COLOUR))
    return placed(ringing(sound, VOLLEY_RING), wet_db=-1)


def arc_voice(body, fizz):
    """Sparks of the hot arc heard as a ringing body and a bright fizz."""
    return ringing(convolve(body, snap(FRY_COLOUR)), FRY_RING) + convolve(fizz, snap(FIZZ_COLOUR))


def hot_arc():
    """The hot channel fries through the half cycle over a low rush, and at times restrikes with a sharp snap."""
    body, fizz = (sum(level(pick(rows, 0, column)) for rows in ARC) for column in (1, 2))
    spikes = discharges(RESTRIKE, window=.007, scatter_db=4.5, cycle_db=1.0, polarity_db=-3.5,
                        crooked=1.0, count=12)
    rush = convolve(spikes * level(RUSH), snap(RUSH_COLOUR))
    frying = arc_voice(amp(-1.57) * spikes * body, amp(-1.1) * spikes * fizz)
    snaps = discharges(RESTRIKE, window=0.0005, scatter_db=2, cycle_db=0.0, polarity_db=1.5,
                       crooked=0.22, count=1)
    strikes = arc_voice(snaps * gates(pick(STRIKES, 0, 1, 2)), snaps * gates(pick(STRIKES, 0, 1, 3)))
    return placed(frying, wet_db=1.0) + placed(rush, wet_db=-1.5) + placed(strikes, wet_db=-6.0)


def scene():
    """The sparks' echoes dance about while the corona's stay put; the plate is widest and a little left."""
    plate = workshop(creeping_sparks() + squeak(), wide_db=3.0, count=5) * amp([[.25], [-.25]])
    gap = workshop(hot_arc() + volleys() + cracks() + rod(), wide_db=-4.5, count=5)
    still = workshop(corona(), wide_db=-1.5, count=1)
    return plate + gap + still + thumps() + hum() + room_tone()


def record(dry):
    """The microphone drops the deepest bass and rounds off the tallest spikes; the top is cut off."""
    ceiling = .8
    dry = signal.lfilter(*signal.butter(1, 20, "high", fs=SR), dry)
    rounded = dry / (1 + np.abs(dry / ceiling) ** 4) ** (1 / 4)
    size = next_fast_len(N + SR // 4)
    kept = np.fft.rfftfreq(size, 1 / SR) < TOP_HZ
    return irfft(rfft(rounded, size) * kept, size)[:, :N]


dry = scene()
out = record(dry)
digitize_waveform(out)
```